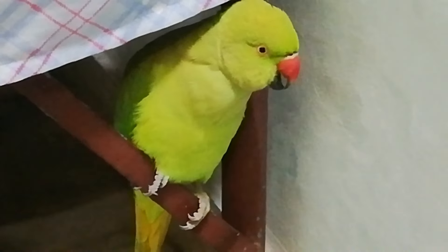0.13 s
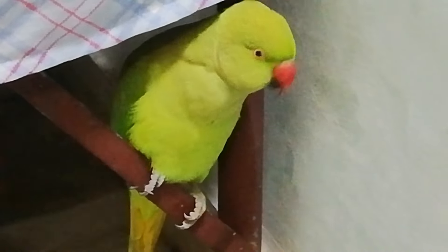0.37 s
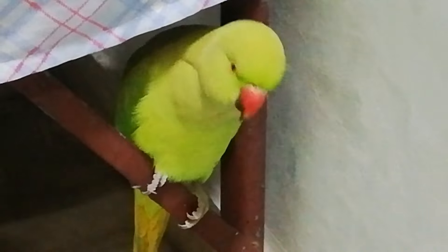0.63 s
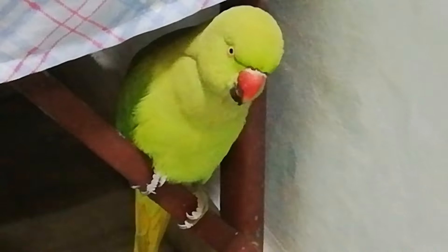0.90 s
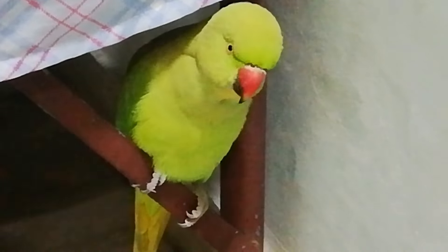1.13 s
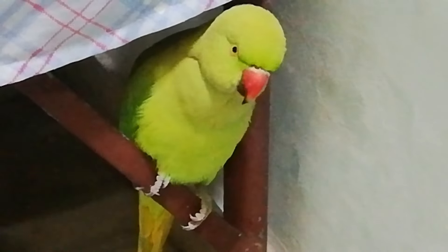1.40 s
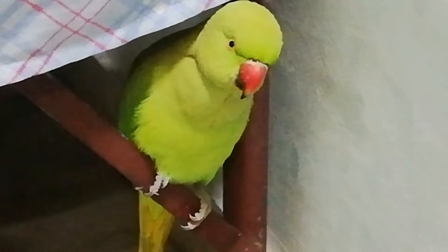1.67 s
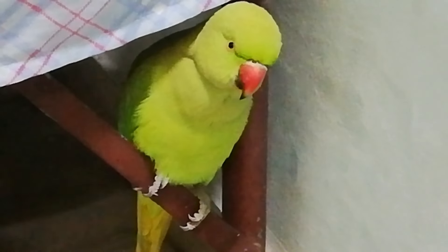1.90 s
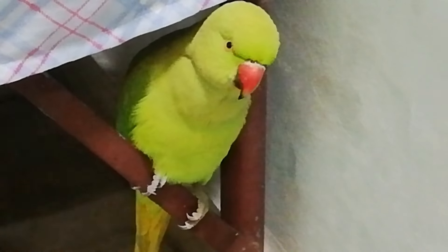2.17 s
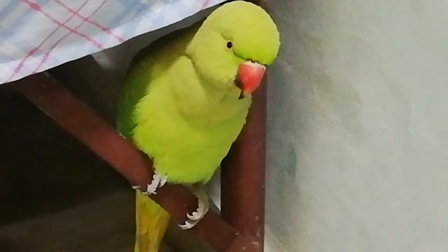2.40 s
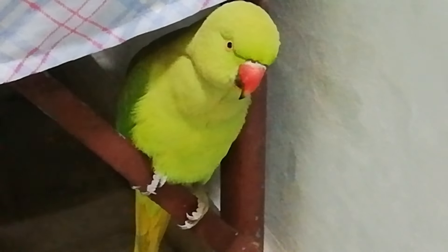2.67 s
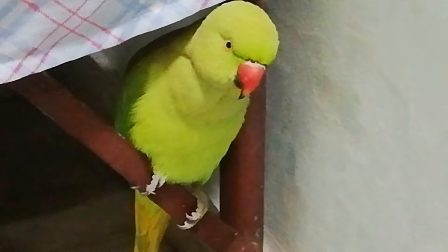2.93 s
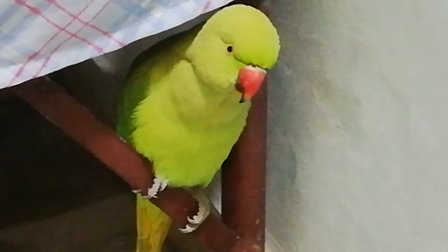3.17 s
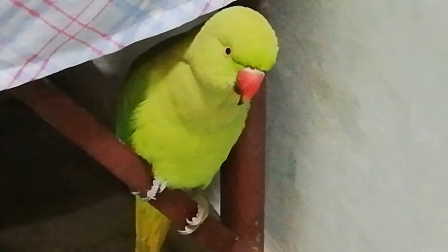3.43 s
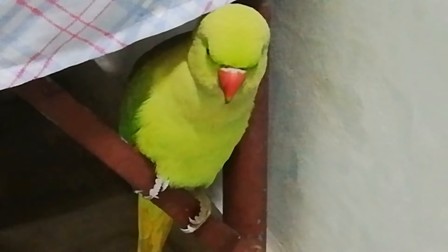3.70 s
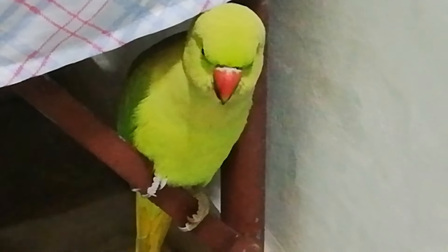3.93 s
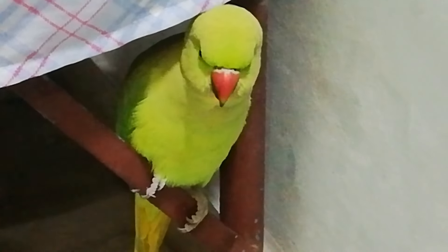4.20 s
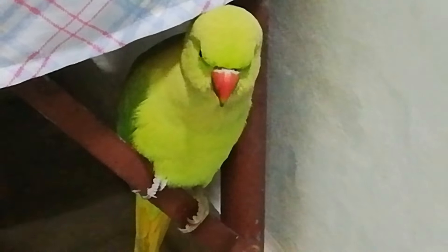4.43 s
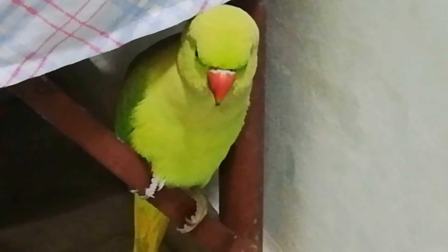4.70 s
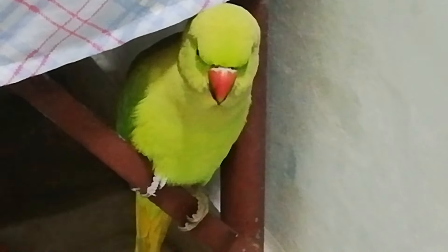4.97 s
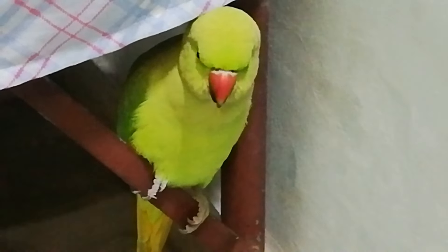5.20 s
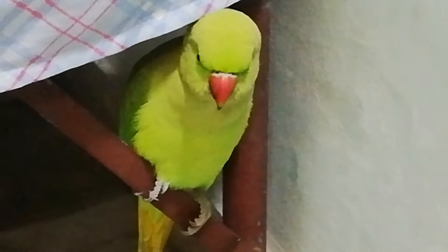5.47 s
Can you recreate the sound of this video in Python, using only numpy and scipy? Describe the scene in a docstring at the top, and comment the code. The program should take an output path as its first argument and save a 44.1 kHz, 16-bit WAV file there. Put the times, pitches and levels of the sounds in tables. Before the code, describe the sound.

A parakeet perched close by is already whistling as it starts, dipping and rising. A low cluck, a tiny croak and a piercing upward chirp follow, then sparse clucks, a long pause, a wavering low call and a final arching whistle. Small hard room, short bright echo, faint rumble and hiss; two spaced microphones, bird nearer the right.

```python
"""A parakeet perched close by, already calling, gives short bending whistles, clucks and one croak
in a small hard-walled room: summed overtones and breath, shaped by throat and beak, or rasping pulses.
Under everything lie a low rumble and a soft hiss of coloured noise; a far clock puffs about once a second.
Two spaced microphones hear it; the left gets bird and clock later. Dense decaying noise makes the room."""
import sys
import numpy as np
from scipy import signal
from scipy.fft import rfft, irfft
from scipy.io import wavfile
from scipy.ndimage import uniform_filter1d

SR = 44100
rng = np.random.default_rng(int(sys.argv[2]) if len(sys.argv) > 2 else 0)


def store_pcm(level_fs):
    """Save levels as 16-bit WAV."""
    pcm = np.round(np.clip(level_fs, -1, 1) * 32767).astype(np.int16)
    wavfile.write(sys.argv[1], SR, np.atleast_2d(pcm).T)


def convert_level_to_amplitude(level_db):
    """Map a level in decibels to its linear amplitude factor."""
    exponent = np.asarray(level_db, float) / 20
    return 10 ** exponent


N = 246519

# Bird's calls, one curve each:
# (time [s], pitch [Hz], level [dB], overtone slope [dB per octave], beak opening [dB])
CALLS = [
    [(0.0, 1610, -28, -3.5, 2), (0.046, 1587, -27.5, -2, -2), (0.132, 1229, -23.5, 7, -5.5),
     (0.16, 1179, -23, 4.5, 5), (0.194, 1255, -21, 3, 4), (0.205, 1339, -27.5, 5.5, -12.5),
     (0.242, 1461, -27.5, -0.5, -5), (0.292, 1471, -33.5, -1, -19.5), (0.315, 1516, -37.5, -6, 16)],
    [(0.843, 460, -35, 2.5, 0.5), (0.857, 492.5, -23, -2.5, 2.5), (0.871, 538.2, -33, -6, -1),
     (0.885, 520.7, -32.5, 0.5, 0)],
    [(1.252, 650, -52, -17, -1), (1.288, 940.4, -40.5, -27, 1.5), (1.302, 1106, -31.5, -24.5, -6),
     (1.338, 1217, -50.5, -7.5, -0.5), (1.35, 1239, -35, -36.5, 8.5)],
    [(1.355, 1959, -44.5, -19, -10.5), (1.363, 2011, -40, -11, -13), (1.38, 2203, -40, 0, -5),
     (1.39, 2349, -26.5, -6.5, -3.5), (1.399, 2424, -38, -4, 6.5), (1.41, 2642, -31.5, -4, -9),
     (1.42, 2867, -23.5, 8.5, 0.5), (1.432, 3054, -18, 10.5, 3), (1.454, 3180, -19.5, 10.5, -2.5),
     (1.47, 3240, -19, 8, 1), (1.488, 3345, -17.5, 9.5, 0.5), (1.5, 3444, -20.5, 5, 0)],
    [(1.618, 2214, -36.5, -3, 6), (1.636, 2394, -35, -1, 1.5)],
    [(2.472, 569.6, -36, -14, 0), (2.488, 550.6, -32, -9.5, 3.5), (2.508, 503, -34, -10.5, -19.5),
     (2.525, 491, -46, -12.5, -13.5)],
    [(2.741, 1086, -35.5, -11, 3.5), (2.754, 1076, -31, -10.5, 0.5), (2.757, 1037, -28, -6.5, 0.5),
     (2.766, 664.3, -29.5, -3, -10.5), (2.774, 547.6, -24.5, -7.5, 7.5), (2.79, 476, -39.5, -11, 2),
     (2.81, 373.4, -41.5, -9.5, -10)],
    [(3.905, 627.2, -54.5, -17, -9), (3.915, 646.4, -43.5, -13, -30.5), (3.941, 762, -27, -1, -23.5),
     (3.951, 843, -30, -2.5, -8), (3.98, 916.7, -24, 0, -9.5), (3.996, 943.3, -26, -12, 26.5),
     (4.04, 1002, -34, -10.5, 20.5), (4.072, 957, -68, 2, -16)],
    [(4.083, 1377, -44, 0, 8), (4.095, 1255, -32, -1.5, 26), (4.111, 1134, -38.5, 0, 7),
     (4.13, 1034, -34, -5, 3), (4.15, 977, -37, -7, 9), (4.2, 877.3, -28.5, 2.5, -42),
     (4.232, 863.6, -32.5, -6.5, -5.5), (4.26, 849.8, -39.5, -10, 4), (4.286, 888.3, -35, -20.5, 30.5),
     (4.312, 1144, -28.5, -11, 23.5), (4.34, 1315, -38, -18, 27.5), (4.385, 1255, -41, -18.5, 15)],
    [(4.968, 755, -30, -15, 3.5), (4.975, 1323, -31, 11.5, -37.5), (4.988, 1572, -22.5, -9, 3),
     (4.998, 1917, -30, 5, -5), (5.032, 2040, -26.5, 4, -13.5), (5.08, 1903, -22.5, 0.5, 4.5),
     (5.11, 1720, -27, -10, 4.5), (5.13, 1706, -27, -2.5, 10), (5.218, 1647, -25.5, -3, 10.5),
     (5.25, 1655, -31, -8, 11), (5.272, 1535, -25.5, -1, 1), (5.34, 1113, -31, 7, -33),
     (5.354, 1099, -37, -14, -16), (5.38, 1104, -35.5, -4.5, -13)],
]
# Hollow the tongue leaves in the overtones, one row per call:
# (centre [Hz], depth [dB], half width [octaves])
TONGUE_HOLLOWS = [(6000, -1.5, 0.15), (5960, -18.5, 0.23), (3990, -7, 0.26), (3285, -3, .22),
                  (3500, -4.5, 0.24), (2880, -6, 0.54), (3100, -10.5, 0.5), (5640, -10.5, 0.19),
                  (4400, -14, 0.24), (7140, -5, .22)]
# Voicing, one row per call:
# (even overtones [dB], air [dB], mouth gain [dB], beak gain [dB], top gain [dB])
CALL_VOICING = [(0.5, -30.5, 0, -7, -22.5), (-3.5, -21, -16, -5.5, 3.5), (3.5, -24.5, -12, -4.5, -2),
                (-1, -33.5, 5, -3.5, -29), (0, -30, -14.5, -2, -45), (-4, -13.5, 8.5, 14.5, 23),
                (-3.5, -17.5, 3, 5, 21), (-1.5, -33, -2.5, 6, 0.5), (-1, -23.5, -25, -7.5, -15.5),
                (5.5, -35.5, -4, -14.5, -19)]
# Windpipe and beak response: (frequency [Hz], gain [dB])
THROAT_RESPONSE = [(400, -17.5), (700, -6.5), (1200, 5), (2000, 8), (2700, 9.5), (3500, 5.5), (4500, 9),
                   (6000, 2.63), (7500, -2.5), (9500, 0.5), (10800, -10), (12000, -17.5), (15500, -23.5)]
# Croak, one row per push: (start [s], length [s], level [dB], mouth resonance over body [dB])
CROAK_PUSHES = [(0.962, 0.044, -42.5, -5), (1.002, .088, -37, -35.5)]
# Spectrum of the croak's body: (frequency [Hz], relative density [dB per Hz])
CROAK_SPECTRUM = [(180, -81), (300, -32), (509, -6.5), (835, -9), (1030, -5.5), (1200, -16.5), (1420, -4),
                  (1870, -1.5), (2560, -4.5), (2880, -13), (4420, -23.5), (5300, -45.5), (7750, -41.5),
                  (9450, -21.5), (15500, -68)]
# Bursts of rasping air where the voice cracks: (start [s], length [s], level [dB])
VOICE_CRACKS = [(2.758, 0.034, -40), (4.084, .03, -34), (4.981, 0.026, -34.5)]
# Spectrum of the clock's puff: (frequency [Hz], relative density [dB per Hz])
TICK_SPECTRUM = [(350, -37), (600, -20.5), (1070, -2), (1530, -20.5), (1740, -10), (3080, -5), (3800, -16),
                 (5490, -9.5), (14000, -32.5)]
# Spectrum of the hiss: (frequency [Hz], relative density [dB per Hz])
HISS_SPECTRUM = [(120, -32.5), (200, -11.5), (249, -4), (333, -8), (399, -6), (641, -17), (957, -6),
                 (1300, -11.5), (1980, -12), (2290, -19.5), (3420, -17), (15500, -28)]
# Spectrum of the rumble: (frequency [Hz], relative density [dB per Hz])
RUMBLE_SPECTRUM = [(8, -6.5), (24, 4), (33, -13), (42, -11.5), (57, 3), (78, -2), (107, -6), (135, 1),
                   (186, -10.5), (206, -19), (260, -19), (340, -46.5)]
# Swells of the rumble: (time [s], half width [s], rise [dB])
RUMBLE_SWELLS = [(0.601, 0.142, 4.5), (4.14, .1, 3), (4.73, 0.17, 9), (5.499, 0.17, 3)]
# Likeness of the background at the two microphones: (frequency [Hz], correlation [-1 to 1])
MICROPHONE_LIKENESS = [(60, 0.97), (150, 1), (380, -0.2), (950, -0.58), (2380, 0.23), (5980, -0.05),
                       (15000, -0.04)]
# Direct sound, left microphone over right: (frequency [Hz], level difference [dB])
LEFT_OVER_RIGHT = [(60, 4), (110, 8.5), (200, -3), (380, 8.5), (700, -18.5), (1290, -14.5), (2380, -15),
                   (4400, 10), (8120, -12), (15000, 0)]
# Room decay: (frequency [Hz], time to fall by 60 dB [s])
ROOM_DECAY = [(400, 0.17), (1200, 0.55), (3000, 0.59), (7000, 0.43), (12000, 0.11)]

LEAD = SR // 5   # samples run before the start, so the first call is already sounding
MOUTH_HZ, BEAK_HZ, EDGE_HZ = 3000, 6200, 11200   # corners between the registers
MOUTH_FOLLOWS, BEAK_FOLLOWS, TOP_FOLLOWS = 0.94, 0.71, 0.95   # share of the beak opening each takes
FLUTTER_HZ, FLUTTER_DB = 371, -25   # mean rate; each sideband re the tone, from 1300 Hz pitch up
JITTER = 0.004746   # pitch spread as a fraction, for a call with air at -30.5 dB
SHIMMER_DB_PER_OVERTONE = 0.6   # times the overtone's number, up to the eighth
LEFT_LATE_MS = 0.5612
ROOM_DB, ROOM_BUILD_S = -3, 0.0012
EARLY_DB, EARLY_S = 5, 0.0091   # extra over the later tail at zero lag, and its 1/e decay
HISS_DB, RUMBLE_DB, RUMBLE_WAVER_DB = -65.5, -62, 1.0   # rumble level before waver and swells
TICK_FIRST_S, TICK_EVERY_S, TICK_RISE_S, TICK_LENGTH_S, TICK_PEAK_DB = 0.718, 1.002, 0.012, 0.12, -63
CROAK_PULSES_PER_S = 470   # before the rate wanders
CROAK_ATTACK_S, CROAK_RELEASE_S, CROAK_SWELL_DB = 0.0023, 0.015, 0.5
CROAK_THROB_HZ, CROAK_THROB_DB, CROAK_AIR = 69, 4.5, 0.6   # air as a ratio to the pulses


def at_hz(points, hz):
    """Reads a table on a log-frequency axis."""
    table_hz, values = np.transpose(points)
    return np.interp(np.log(hz + 1), np.log(table_hz), values)


def rms_one(x):
    """Scales to unit power."""
    return x / np.sqrt(np.mean(x ** 2) + 1e-20)


def coloured(x, spectrum):
    """Imposes a spectrum in dB."""
    size = x.shape[-1]
    gain = convert_level_to_amplitude(at_hz(spectrum, np.fft.rfftfreq(size, 1 / SR)))
    return irfft(rfft(x) * gain, size)


def drift(rate, size):
    """Slow random wander of unit spread: noise through a double low-pass at the given rate in Hz."""
    r = np.exp(-2 * np.pi * rate / SR)
    wander = signal.lfilter([1], [1, -2 * r, r * r], rng.standard_normal(size + SR))
    return rms_one(wander[SR:])   # the first second lets the filter settle


def registers(hz):
    """Shares of the throat, mouth, beak and topmost registers at each frequency; they sum to 1."""
    mouth, beak, edge = [1 - 1 / (1 + (hz / corner) ** 16) for corner in (MOUTH_HZ, BEAK_HZ, EDGE_HZ)]
    return [1 - mouth, mouth - beak, beak - edge, edge]


def hollow(hz, centre_hz, depth_db, octaves):
    """A bell-shaped dip in dB on a log-frequency axis."""
    return depth_db * np.exp(-(np.log2((hz + 1) / centre_hz) / np.maximum(octaves, .1)) ** 2)


def played(tables, t, attack_s, release_s):
    """Joins the calls into smooth control curves; the gate is open only inside them."""
    times, *columns = np.transpose(np.concatenate(tables))
    gate = 0
    for rows in tables:
        start = rows[0][0] if rows[0][0] > 0 else t[0]
        opening = (t - start) / attack_s + .5
        closing = (rows[-1][0] - t) / release_s + 1
        gate = gate + np.clip(np.minimum(opening, closing), 0, 1)
    gate = np.clip(gate, 0, 1)
    # muscles cannot jump: every control is rounded over a few milliseconds
    controls = uniform_filter1d([np.interp(t, times, c) for c in columns], size=SR // 200, axis=1)
    return gate ** 2, controls


def breath(t, phase, openings_db, dip):
    """Air rushes through in the open half of each cycle and leaves by the same openings as the tone."""
    size = len(t)
    puffs = rng.standard_normal(size) * (1 + np.sin(phase))
    spectrum = rfft(rms_one(coloured(puffs, THROAT_RESPONSE)))
    shares = registers(np.fft.rfftfreq(size, 1 / SR))
    low, *upper = [irfft(spectrum * share, size) for share in shares]
    air = low + sum(convert_level_to_amplitude(db) * band for db, band in zip(openings_db, upper))
    hz, times, frames = signal.stft(air, SR, nperseg=256)
    dips_db = hollow(hz[:, None], *[np.interp(times + t[0], t, c) for c in dip])
    return signal.istft(frames * convert_level_to_amplitude(dips_db), SR, nperseg=256)[1][:size]


def voice(t):
    """The syrinx gives a stack of overtones, weighted by the throat and fluttered by a slower membrane."""
    calls = [[point + dip + voicing for point in curve]
             for curve, dip, voicing in zip(CALLS, TONGUE_HOLLOWS, CALL_VOICING)]
    gate, controls = played(calls, t, attack_s=0.005, release_s=0.0038)
    pitch, level_db, slope_db, open_db = controls[:4]
    dip = controls[4:7]
    even_db, air_db = controls[7:9]
    follows = (MOUTH_FOLLOWS, BEAK_FOLLOWS, TOP_FOLLOWS)
    openings_db = [db + share * open_db for db, share in zip(controls[9:], follows)]

    # a breathy voice holds its pitch less well
    jitter = JITTER * convert_level_to_amplitude((air_db + 30.5) / 2) * drift(150, len(t))
    phase = 2 * np.pi * np.cumsum(pitch * (1 + jitter)) / SR
    on = gate > 0
    tone, power = np.zeros(len(t)), 1e-12
    shimmer = [drift(33, len(t))[on] for _ in range(6)]
    for k in range(1, 31):
        hz = k * pitch[on]
        throat_db = at_hz(THROAT_RESPONSE, hz) + hollow(hz, *dip[:, on])
        throat_db += sum(db[on] * share for db, share in zip(openings_db, registers(hz)[1:]))
        source_db = slope_db[on] * np.log2(k) + even_db[on] * (k % 2 == 0)
        unsteady_db = SHIMMER_DB_PER_OVERTONE * min(k, 8) * shimmer[k % 6]
        top_fade = np.clip(16.3 - hz / 1000, 0, 1)   # silent from 16.3 kHz up
        gain = convert_level_to_amplitude(throat_db + source_db + unsteady_db) * top_fade
        tone[on] += gain * np.sin(k * phase[on])
        power = power + gain ** 2 / 2
    tone[on] /= np.sqrt(power)

    wobble = 2 * np.pi * np.cumsum(FLUTTER_HZ * (1 + 0.042 * drift(16, len(t)))) / SR
    depth = 2 * convert_level_to_amplitude(FLUTTER_DB) * np.clip(pitch / 1300, 0, 1) ** 2   # fades on low notes
    flutter = 1 + depth * np.sin(wobble)
    air = breath(t, phase, openings_db, dip)
    return gate * convert_level_to_amplitude(level_db) * (tone * flutter + convert_level_to_amplitude(air_db) * air)


def direct(x):
    """Straight path from bird and clock, nearer the right: the left microphone hears it later and shaded."""
    half = np.array(LEFT_OVER_RIGHT) * [1, .5]   # each side takes half the difference
    index = np.arange(len(x))
    late = np.interp(index - LEFT_LATE_MS * SR / 1000, index, x)
    return np.array([coloured(late, half), coloured(x, half * [1, -1])])


def room(x):
    """Dense reflections, unrelated at the two microphones, dying octave by octave."""
    lag = np.arange(int(.8 * SR)) / SR
    tail, edges = 0, 250 * 2. ** np.arange(7)
    for low, high in zip(edges, edges[1:]):
        octave = signal.butter(2, [low, high], "band", fs=SR, output="sos")
        band = signal.sosfilt(octave, rng.standard_normal((2, len(lag))))
        tail = tail + band * convert_level_to_amplitude(-60 * lag / at_hz(ROOM_DECAY, np.sqrt(low * high)))
    tail = tail * np.clip(lag / ROOM_BUILD_S - .5, 0, 1)
    tail = tail * (1 + convert_level_to_amplitude(EARLY_DB) * np.exp(-lag / EARLY_S))   # the near wall answers first and strongest
    tail = tail / np.sqrt(np.sum(tail ** 2) / 2)
    return signal.fftconvolve(x[None], tail, axes=1)[:, :len(x)]


def background():
    """Wavering, swelling rumble and steady hiss: noise as alike at the microphones as the table says."""
    alike = np.clip(at_hz(MICROPHONE_LIKENESS, np.fft.rfftfreq(N, 1 / SR)), -1, 1)
    mid, side = rfft(rng.standard_normal((2, 2, N)))
    both = np.sqrt(1 + alike) * mid[:, None] + np.sqrt(1 - alike) * side[:, None] * [[1], [-1]]
    rumble = rms_one(coloured(irfft(both[0], N), RUMBLE_SPECTRUM))
    hiss = rms_one(coloured(irfft(both[1], N), HISS_SPECTRUM))
    t = np.arange(N) / SR
    swell_db = sum(db * np.exp(-((t - s) / width) ** 2) for s, width, db in RUMBLE_SWELLS)
    rumble_db = RUMBLE_DB + swell_db + RUMBLE_WAVER_DB * drift(4.4, N)
    return convert_level_to_amplitude(rumble_db) * rumble + convert_level_to_amplitude(HISS_DB) * hiss


def clock(t):
    """Each far tick arrives as a soft puff of noise with a quick start."""
    since = (t - TICK_FIRST_S) % TICK_EVERY_S
    shape = np.interp(since, [0, TICK_RISE_S, TICK_LENGTH_S], [0, 1, .3], 0, 0)
    return convert_level_to_amplitude(TICK_PEAK_DB) * shape * rms_one(coloured(rng.standard_normal(len(t)), TICK_SPECTRUM))


def croak(t):
    """Uneven pulses in throbs, mixed with rasping air; each push swells in its middle."""
    rate = CROAK_PULSES_PER_S * np.exp(0.2 * drift(250, len(t)))
    count = np.floor(np.cumsum(rate) / SR)
    pulses = np.diff(count, prepend=0) * convert_level_to_amplitude(0.83 * rng.standard_normal(len(t)))   # uneven strength
    rasp = rms_one(pulses - pulses.mean()) + CROAK_AIR * rng.standard_normal(len(t))
    throb_phase = 2 * np.pi * CROAK_THROB_HZ * (t - 1.012) + 0.35 * drift(14, len(t))
    rasp = rasp * convert_level_to_amplitude(CROAK_THROB_DB * np.cos(throb_phase))
    resonance = signal.butter(3, [3600, 5200], "band", fs=SR, output="sos")
    mouth = rms_one(signal.sosfilt(resonance, rasp))
    body, out = rms_one(coloured(rasp, CROAK_SPECTRUM)), 0
    for start, length, level_db, mouth_db in CROAK_PUSHES:
        end = start + length
        gate = np.interp(t, [start, start + CROAK_ATTACK_S, end, end + CROAK_RELEASE_S], [0, 1, 1, 0]) ** 2
        swell_db = CROAK_SWELL_DB * np.sin(np.pi * np.clip((t - start) / length, 0, 1))
        out = out + gate * convert_level_to_amplitude(level_db + swell_db) * (body + convert_level_to_amplitude(mouth_db) * mouth)
    return out


def cracks(t):
    """Where the voice breaks, the folds flap unevenly and let rough air through the throat."""
    shape = np.zeros(len(t))
    for start, length, level_db in VOICE_CRACKS:
        shape += convert_level_to_amplitude(level_db) * np.interp(t, [start, start + 0.004, start + length], [0, 1, 0], 0, 0)
    flapping = convert_level_to_amplitude(5.1 * drift(290, len(t)))
    return shape * rms_one(coloured(flapping * rng.standard_normal(len(t)), THROAT_RESPONSE))


def scene():
    """Bird and clock reach the microphones directly and by the room, over the background."""
    t = np.arange(-LEAD, N) / SR
    sources = voice(t) + clock(t) + croak(t) + cracks(t)
    heard = direct(sources) + convert_level_to_amplitude(ROOM_DB) * room(sources)
    return heard[:, LEAD:] + background()


def roll_off(x):
    """The treble ends steeply here."""
    return signal.sosfilt(signal.butter(12, 15660, fs=SR, output="sos"), x)


def record(dry):
    """Takes the finished two-microphone mix to its final form."""
    return roll_off(dry)


dry = scene()
out = record(dry)
store_pcm(out)
```